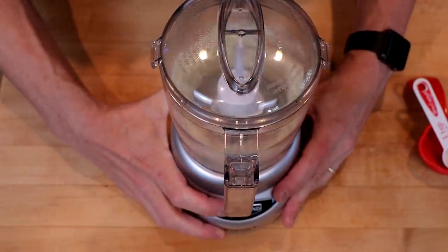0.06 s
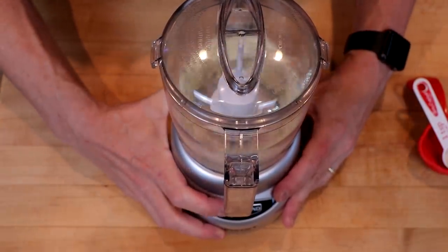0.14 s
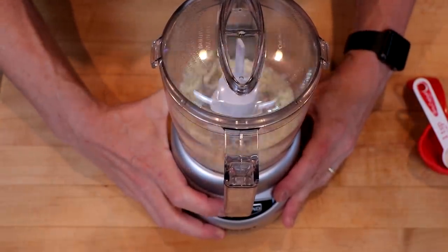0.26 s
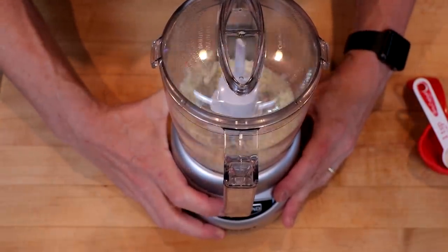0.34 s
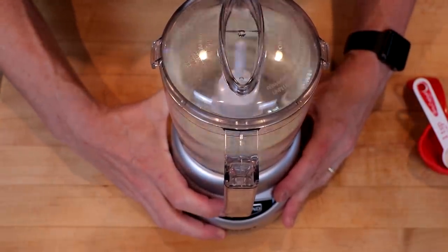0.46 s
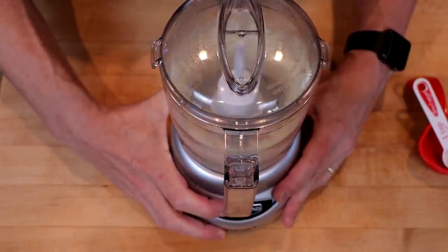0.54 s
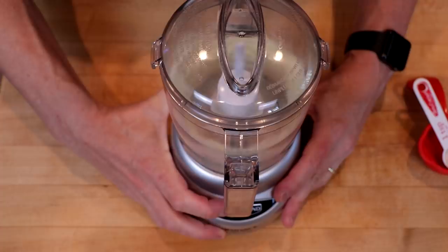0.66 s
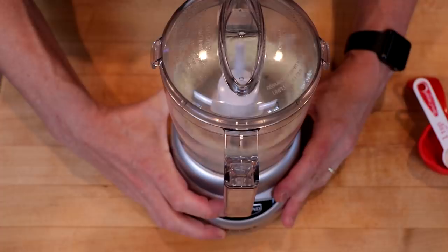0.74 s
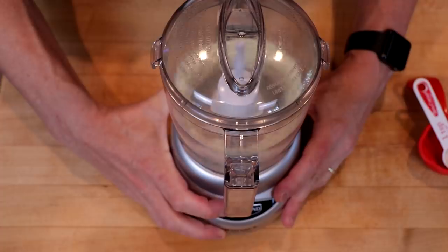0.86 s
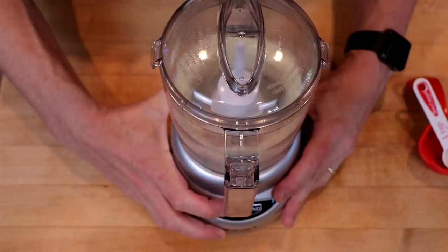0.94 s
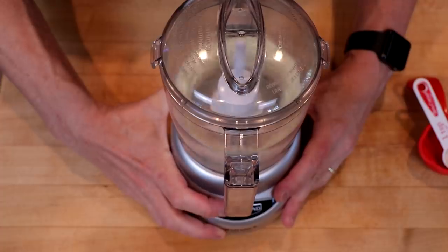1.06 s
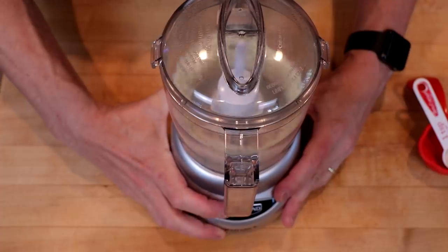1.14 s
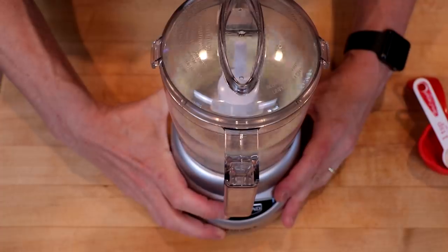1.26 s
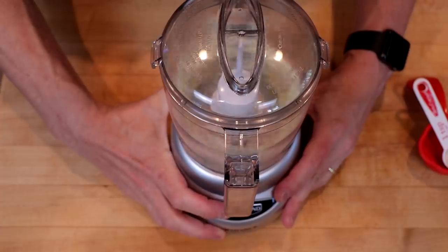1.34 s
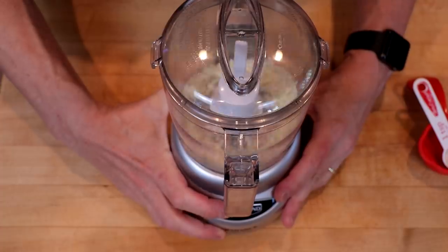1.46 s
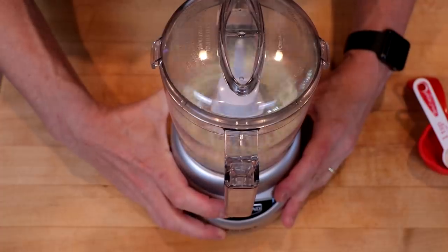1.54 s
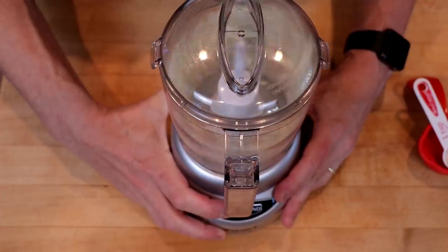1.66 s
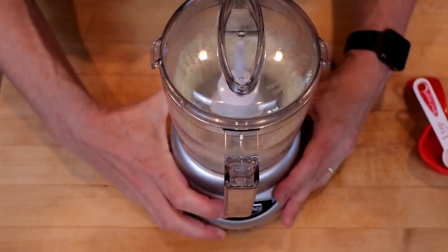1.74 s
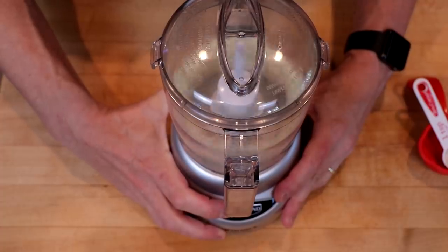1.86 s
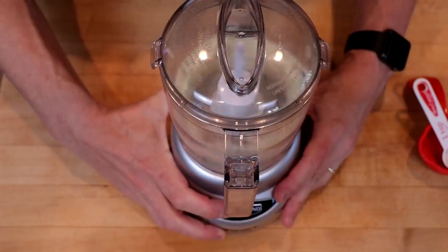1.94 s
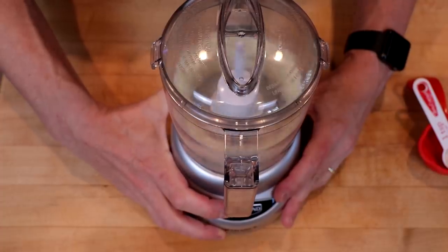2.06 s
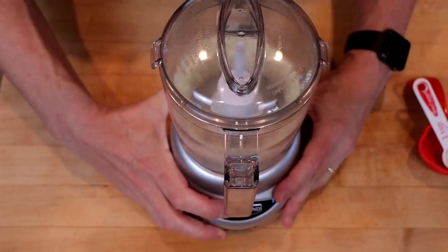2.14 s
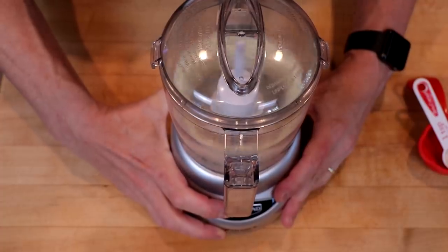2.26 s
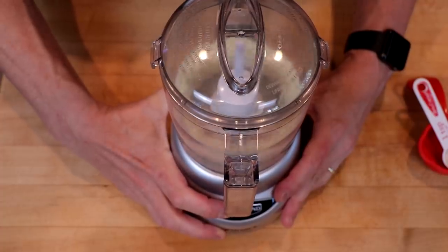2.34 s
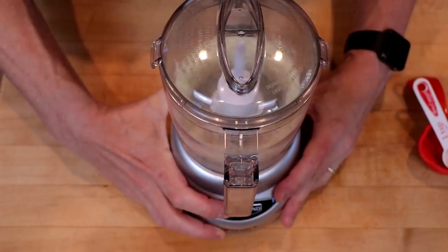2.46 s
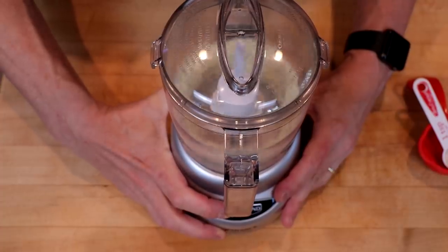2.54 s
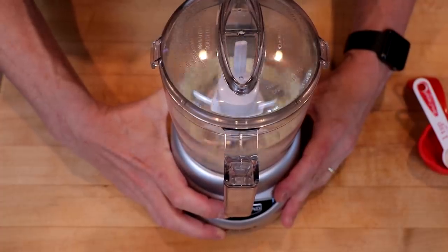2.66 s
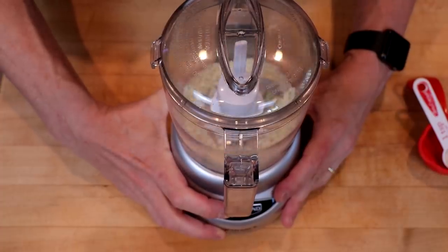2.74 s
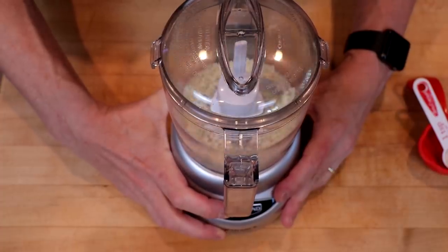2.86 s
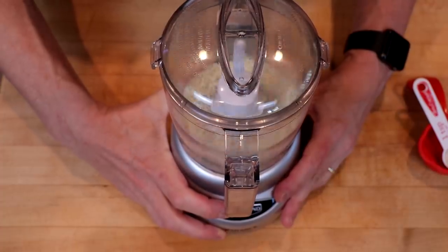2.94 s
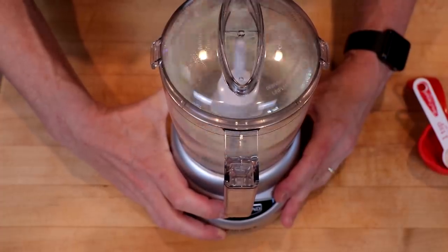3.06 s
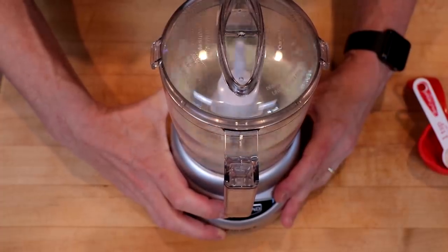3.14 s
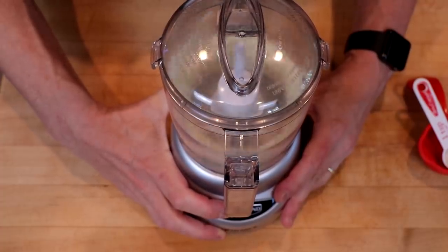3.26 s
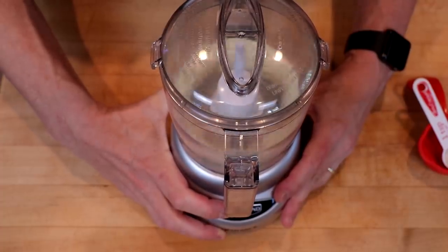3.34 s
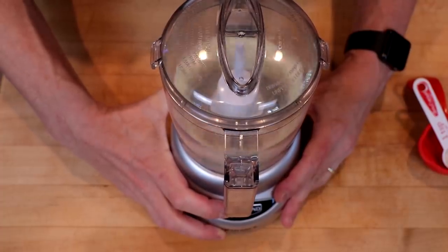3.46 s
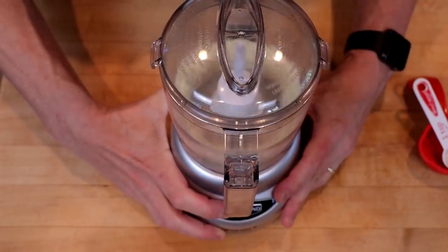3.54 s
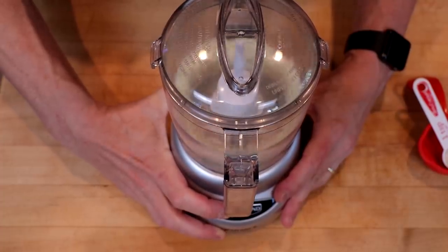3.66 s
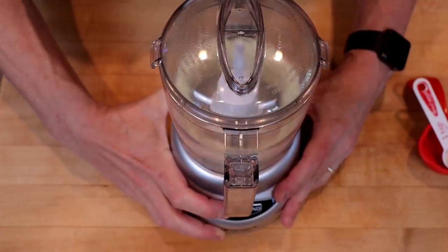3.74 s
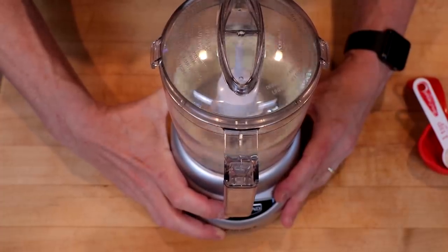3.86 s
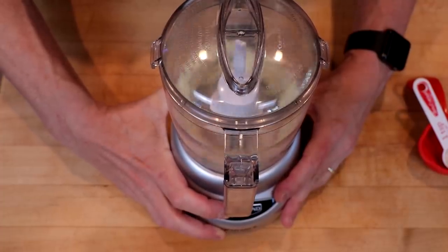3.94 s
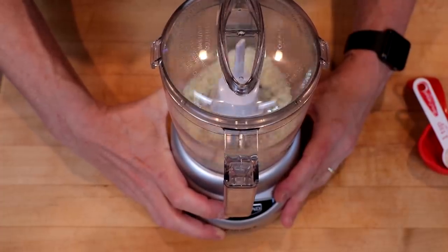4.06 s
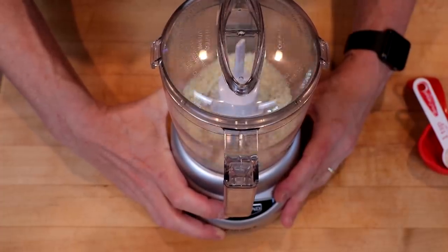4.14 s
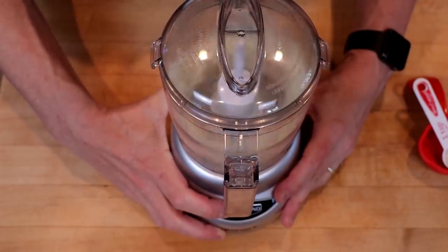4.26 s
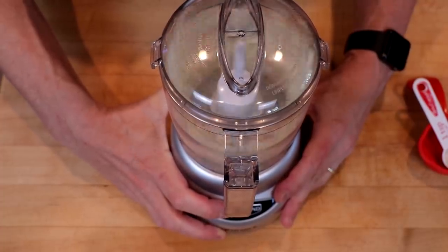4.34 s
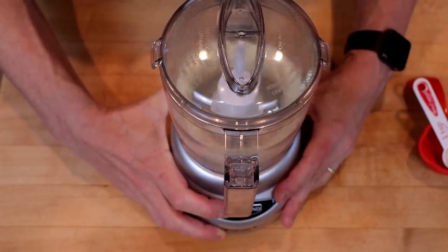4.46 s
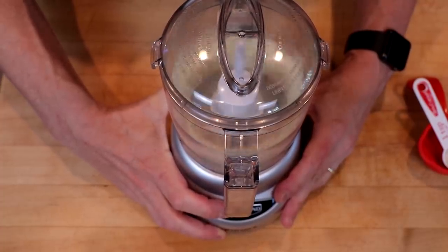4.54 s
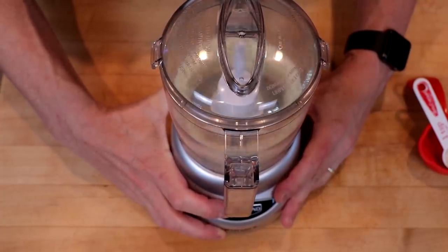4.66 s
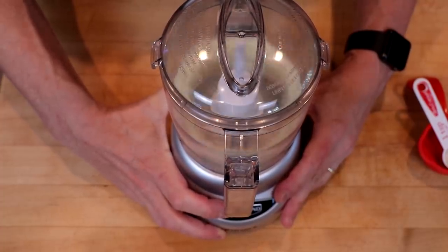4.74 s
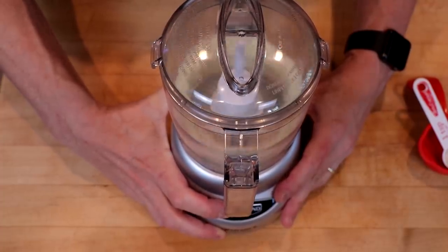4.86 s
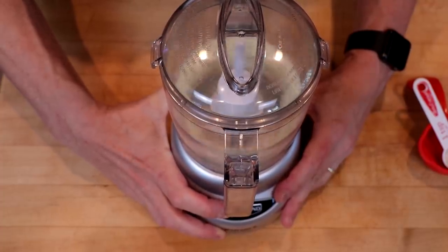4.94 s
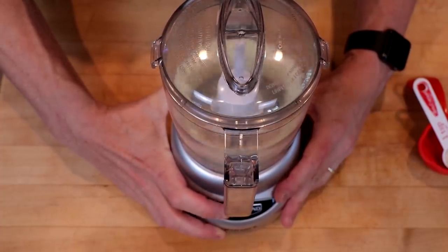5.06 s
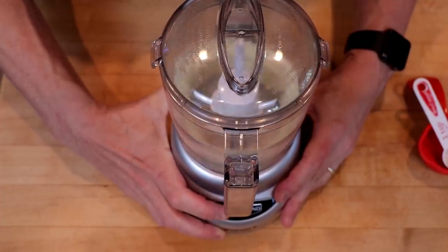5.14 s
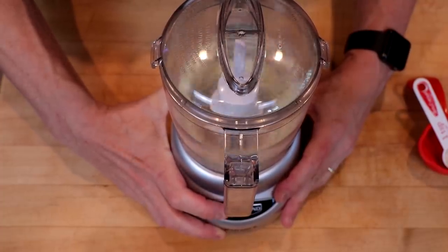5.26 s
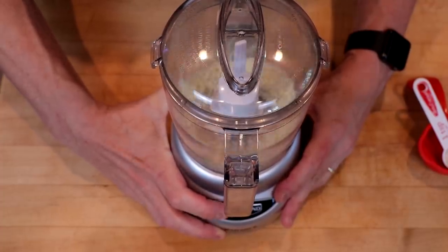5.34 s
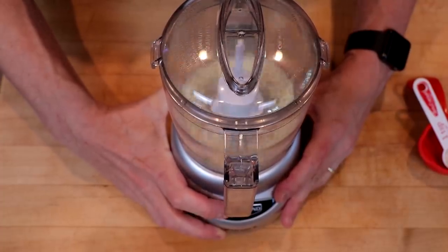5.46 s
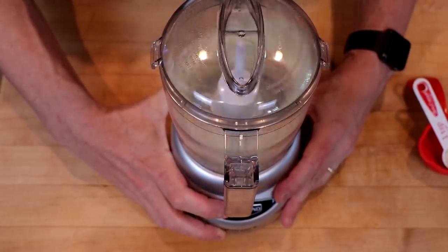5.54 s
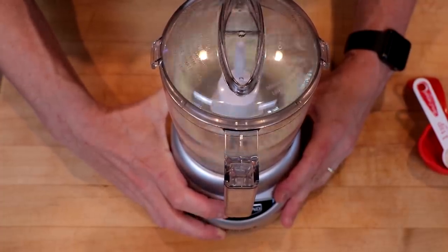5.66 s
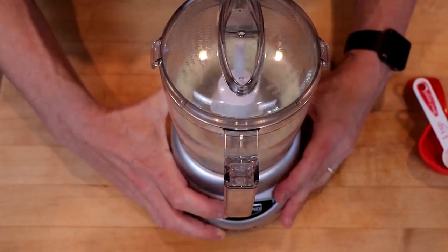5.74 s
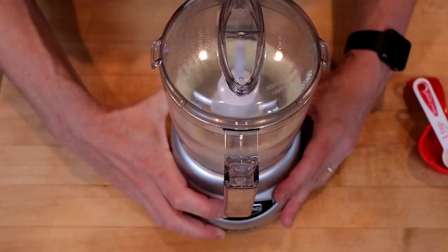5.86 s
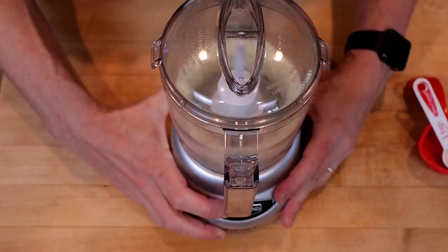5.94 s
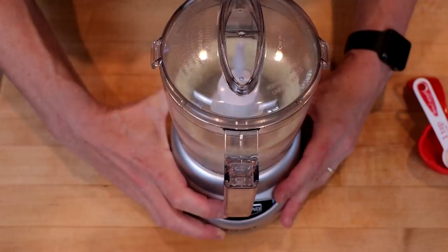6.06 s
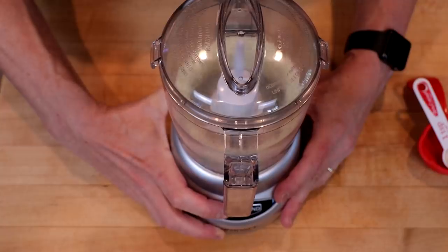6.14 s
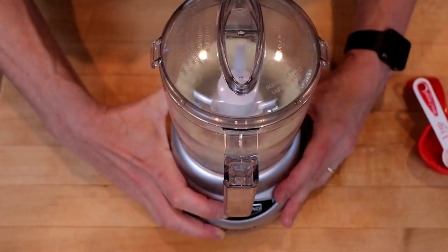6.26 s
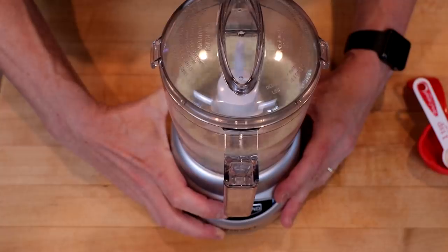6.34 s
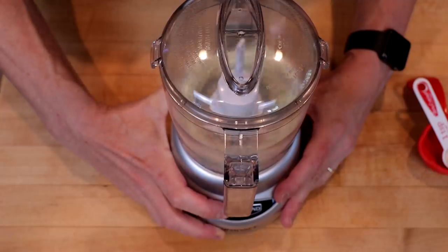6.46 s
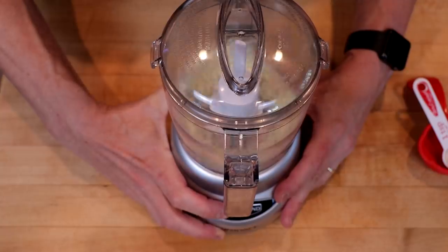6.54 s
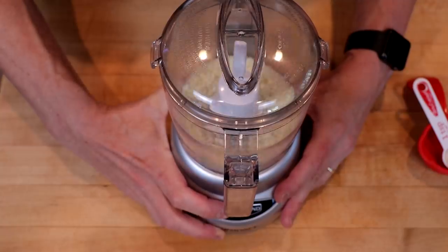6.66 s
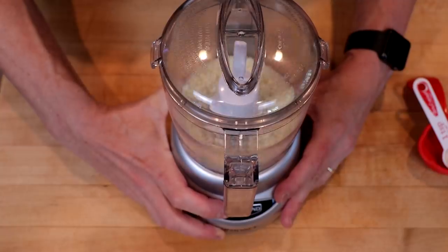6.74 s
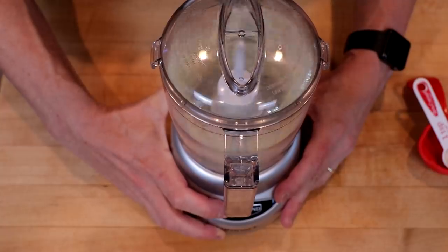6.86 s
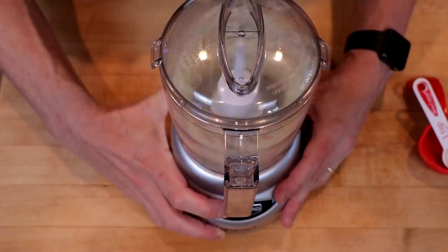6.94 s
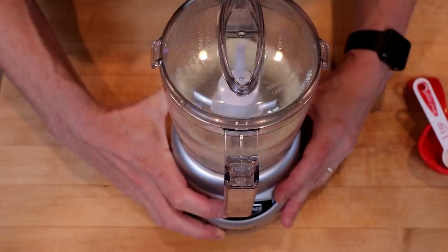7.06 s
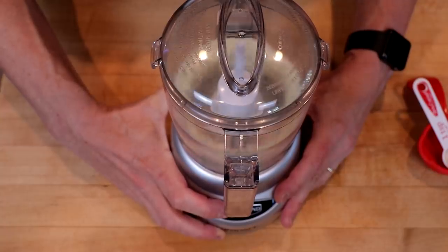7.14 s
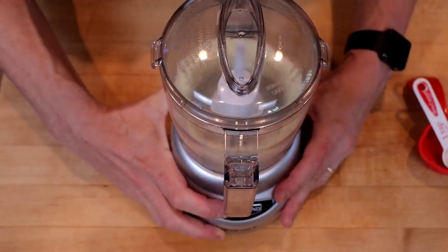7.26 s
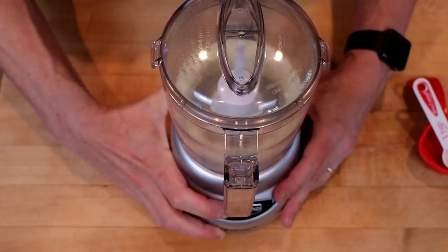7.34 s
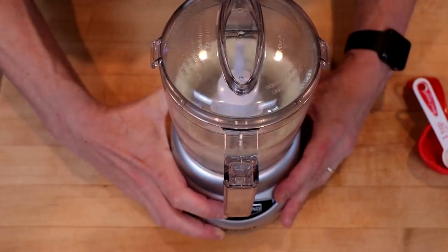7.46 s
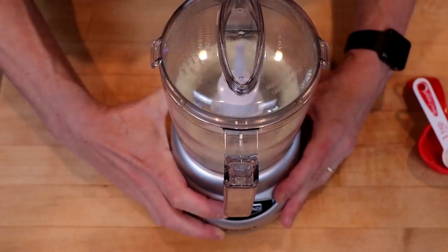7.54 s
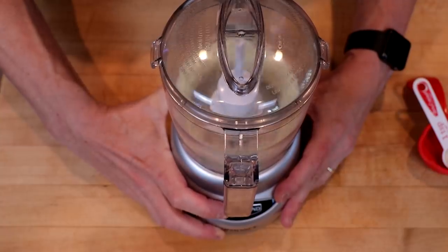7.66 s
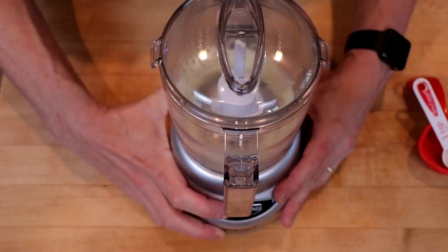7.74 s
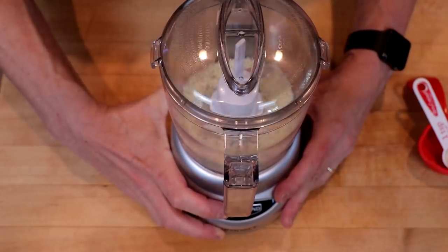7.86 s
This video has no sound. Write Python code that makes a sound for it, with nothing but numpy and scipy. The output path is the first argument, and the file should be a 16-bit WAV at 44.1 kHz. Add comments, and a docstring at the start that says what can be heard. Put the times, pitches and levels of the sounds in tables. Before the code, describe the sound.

Six short bursts of a food processor in a quiet kitchen, each a rattling whine with pattering food, ending in a falling whir.

```python
"""A small food processor on a wooden kitchen counter. An earlier pulse coasts out and the bowl settles.
Six pulses follow. Each press jerks the drive into motion and flings food off the blade; the reduction
gears whine up and rattle. Cheese and flour pelt the plastic bowl, lumps knock, heaps drag the speed down.
On release, friction brings the gears to rest in a falling whine. The quiet room hums between pulses."""
import sys
import numpy as np
from scipy import signal
from scipy.fft import rfft, irfft
from scipy.io import wavfile
from scipy.ndimage import uniform_filter1d

SR = 44100
rng = np.random.default_rng(int(sys.argv[2]) if len(sys.argv) > 2 else 0)


def persist_wave(psi):
    """Save psi, clipped to +-1, as 16-bit WAV."""
    counts = np.round(np.clip(psi, -1, 1) * 32767).astype(np.int16)
    wavfile.write(sys.argv[1], SR, np.atleast_2d(counts).T)


N = 348390
TIME = np.arange(N) / SR
PINION_TEETH, WHEEL_TEETH = 11, 57
BAND_LIMIT_HZ = 15950


def amp(db):
    """Decibels to gain."""
    return 10 ** (np.asarray(db) / 20)


def unit(x):
    """Scale to rms 1."""
    return x / np.sqrt(np.mean(x ** 2) + 1e-20)


def log_interp(points, hz):
    """Interpolate on a log-frequency axis."""
    f, value = np.transpose(points)
    return np.interp(np.log(hz + 1), np.log(f), value)


def colour(x, spectrum):
    """Filter x by a spectrum."""
    return irfft(rfft(x) * amp(log_interp(spectrum, np.fft.rfftfreq(N, 1 / SR))), N)


def drift(hz, order=4):
    """Noise of rms 1, rolled off above hz."""
    f = np.fft.rfftfreq(N, 1 / SR)
    return unit(irfft(rfft(rng.standard_normal(N)) / (1 + (f / hz) ** order), N))


def steady(x, size=3000):
    """Hold the short-term rms at 1."""
    return x / np.sqrt(abs(uniform_filter1d(x ** 2, size)) + 1e-4 * np.mean(x ** 2))


def add(mix, at_s, sound):
    """Mix a sound in at at_s."""
    part = mix[round(at_s * SR):][:len(sound)]
    part += sound[:len(part)]


# Button presses: (on [s], off [s], free tooth rate [Hz], coast time [s],
# whine base [dB], rattle base [dB], chopping base [dB], fling rise [s])
PRESSES = [(-1.0, -.25, 2860, .415, -33.5, -38.5, -46.5, .008),
           (.357, 1.005, 2860, .413, -33.4, -39.4, -43.6, .005),
           (1.547, 2.281, 2868, .411, -33.5, -39.8, -43, .004),
           (2.908, 3.57, 2920, .42, -33.2, -39.8, -43.2, .025),
           (4.2, 4.877, 2903, .445, -33.3, -38.9, -44, .005),
           (5.471, 6.121, 2965, .44, -33.9, -39.2, -43.7, .012),
           (6.75, 7.356, 2955, .444, -33.6, -39.3, -44, .006)]
# Heaps sliding into the blade: (time [s], chopping swell [dB], tooth rate drop [Hz])
HEAPS = [(.617, 9, 205), (.81, 3, 15), (.89, 3, 30), (1.805, 4, 113), (2.04, 4, 60), (2.335, 2.5, 10),
         (3.178, 3, 130), (3.375, 3, 75), (4.46, 2.5, 95), (4.64, 2, 40), (4.803, 5.5, 45),
         (5.725, 1.5, 115), (5.825, 2, 50), (6.12, 4, 10), (7.03, 2.5, 120), (7.125, 1, 35), (7.215, 2, 70),
         (7.32, 3, 10)]


def tooth_rate(spin_up_s=.083, sag_s=.052, coast_bend=1.2):
    """Gear mesh rate in Hz: quick run-up, a sag after each heap, run-down by friction."""
    sag_hz = np.zeros(N)
    for at_s, _, drop_hz in HEAPS:
        age = np.maximum(TIME - at_s, 0) / sag_s
        sag_hz += drop_hz * (age * np.exp(1 - np.minimum(age, 50))) ** 2
    mesh_hz = np.zeros(N)
    for on_s, off_s, free_hz, coast_s, *_ in PRESSES:
        run_up = 1 - np.exp(-(np.clip(TIME, on_s, off_s) - on_s) / spin_up_s)
        run_down = np.clip(1 - (TIME - off_s) / coast_s, 0, 1) ** coast_bend  # 1 = dry friction alone
        mesh_hz += (free_hz - sag_hz) * run_up * run_down
    return mesh_hz


def press_gains():
    """Base gains of whine, rattle and chopping, held until the next press."""
    rows = np.array(PRESSES)
    latest = np.searchsorted(rows[:, 0], TIME) - 1
    return amp(rows[:, 4:7])[latest].T


def blade_load(teeth, once, twice):
    """The blade meets the food once a turn and, with its two wings, twice a turn."""
    angle = 2 * np.pi * teeth / WHEEL_TEETH
    return once * np.sin(angle) + twice * np.sin(2 * angle + 0.96 * drift(5.2))


# Housing response: (frequency [Hz], gain [dB])
HOUSING_SPECTRUM = [(300, -10.5), (700, -6.5), (1150, -2), (1450, 0), (1700, -7.5), (2050, 5.5),
                    (2900, -1.2), (3500, -5), (4400, 0), (5700, 0.8), (7000, 2), (8500, 0.8), (10000, 2),
                    (11900, -5.5), (13300, -15.5)]


def gear_whine(teeth, speed, held, speed_ripple=.009, slip_teeth=.035, backlash_teeth=.045):
    """Tooth rate harmonics, smeared in phase and strength by gear play and the swinging load."""
    load = blade_load(teeth, once=0.75, twice=1.0)
    mesh_hz = np.gradient(teeth) * SR
    phase = teeth + np.cumsum(speed_ripple * mesh_hz * load) / SR + slip_teeth * drift(60)
    phase += backlash_teeth * (1 - speed) * drift(280)
    force_db = 1.1 * load + 1.5 * drift(210) + (0.5 - held) * drift(60)
    # Teeth meet hard under starting torque, softly when coasting.
    softness = 0.37 + (1 - speed) * (.85 * (1 - held) - 0.3 * held)
    tone = np.zeros(N)
    for k in range(1, 11):
        in_band = np.clip((BAND_LIMIT_HZ - k * mesh_hz) / 1000, 0, 1)
        flutter = 1 + .95 * (drift(80, order=1) + 1j * drift(80, order=1))
        strength = in_band * k ** -softness * np.exp(-(k / 7.5) ** 2)  # uneven, jittery teeth smear out high orders
        tone += strength * (flutter * np.exp(2j * np.pi * (k * phase + rng.random()))).real
    return steady(colour(amp(force_db) * tone, HOUSING_SPECTRUM))


# Housing resonances and one gap between them: (centre [Hz], width [Hz], gain [dB])
RESONANCES = [(560, 200, 4), (1020, 160, 3.5), (1650, 220, -3), (2200, 210, 4)]


def coast_resonance_db(mesh_hz, held):
    """The whine swells and dips as the coasting gears pass the housing resonances."""
    return (1 - held) * sum(db * np.exp(-((mesh_hz - hz) / width) ** 2) for hz, width, db in RESONANCES)


# Tooth scrape: (frequency [Hz], level [dB])
RATTLE_SPECTRUM = [(200, -25.5), (900, -10.5), (1450, -5.5), (1700, -1), (2100, -1), (2850, 1.5),
                   (3500, -12), (4300, -9), (5500, 0.5), (6700, -3.7), (8800, -5), (10200, -3), (12200, 0),
                   (13200, -15), (16000, -14)]


def gear_rattle(teeth, speed, rough_db=3.5, tick_db=-3.0, dull_hz=2600):
    """Teeth scrape and clatter in uneven bursts, brighter with speed."""
    contact_db = tick_db * np.cos(2 * np.pi * teeth) + blade_load(teeth, once=0.32, twice=0.7)
    contact_db += rough_db * drift(300)
    scrape = colour(amp(contact_db) * rng.standard_normal(N), RATTLE_SPECTRUM)
    dull = signal.filtfilt(*signal.butter(1, dull_hz, fs=SR), scrape)
    brightness = np.clip(0.08 + speed ** 2.5, 0, 1)
    return steady(dull + brightness * (scrape - dull))


# Food spray on the bowl: (frequency [Hz], level [dB])
CHOP_SPECTRUM = [(40, -40.5), (50, -15), (70, -18), (95, -12.5), (138, -11.5), (170, -6.5), (255, 3.5),
                 (320, 0), (490, -7), (590, 3), (680, 1), (790, 0), (1020, -1), (1200, -5), (2400, -7.5),
                 (5000, -27)]


def chopping(teeth, crumbs_per_s=1800, spread_db=2.0):
    """Crumbs pelt the bowl in a swish of flour, in step with the blade."""
    sizes = amp(spread_db * np.minimum(rng.exponential(1, N), 4)) * rng.choice([-1, 1], N)
    crumbs = unit(sizes * (rng.random(N) < crumbs_per_s / SR))
    flour = 0.4 * rng.standard_normal(N)
    spray = (crumbs + flour) * amp(blade_load(teeth, once=1.1, twice=2.1))
    return steady(colour(spray, CHOP_SPECTRUM))


def food_flow(speed, lag_s=.08, heap_s=.025):
    """Chopping gain: the swirl lags the blade and swells with each heap."""
    pole = np.exp(-1 / (lag_s * SR))
    swirl = signal.lfilter([1 - pole], [1, -pole], speed, zi=[speed[0]])[0]
    swell_db = sum(db * np.exp(-np.minimum(((TIME - at_s) / heap_s) ** 2, 50)) for at_s, db, _ in HEAPS)
    return swirl ** 0.9 * speed ** 0.45 * amp(swell_db)


def food_fling(gain_db=-42.3, fade_s=.07):
    """Extra chopping gain: food resting on the blade is thrown off at each start."""
    flurries = np.zeros(N)
    for on_s, *_, rise_s in PRESSES:
        age_s = np.maximum(TIME - on_s, 0)
        flurries += (1 - np.exp(-age_s / rise_s)) * np.exp(-age_s / fade_s)
    return amp(gain_db) * flurries


def strike(modes, snap_db, snap_s, size=5000):
    """One blow of peak 1: randomly detuned decaying modes plus a noise snap."""
    t = np.arange(size) / SR
    ring = np.zeros(size)
    for hz, db, t60_s in modes:
        cycles = hz * rng.uniform(1.0, 1.04) * t + rng.random()
        ring += amp(db - 60 * t / t60_s) * np.sin(2 * np.pi * cycles)
    snap = amp(snap_db) * rng.standard_normal(size) * np.exp(-t / snap_s)
    blow = (ring / abs(ring).max() + snap) * (1 - np.exp(-t / 0.00023))
    return blow / abs(blow).max()


# Modes of bowl seat, bowl and drive: (frequency [Hz], relative level [dB], t60 [s])
SEAT_MODES = [(730, -5, .05), (950, 0, .07), (1130, -2, .05), (2080, -12, .04)]
BOWL_MODES = [(250, -6.5, 0.055), (585, -2.5, 0.035), (730, -4, 0.086), (954, -2, 0.11), (1500, -7, 0.075),
              (1900, -2.5, 0.035), (2600, -16, .015)]
DRIVE_MODES = [(586, -8.5, 0.061), (1250, -7, 0.013), (1940, 18.5, 0.0067), (2270, -3.5, 0.015),
               (2750, -41.5, 0.0062)]
# Gears taking up slack: (time [s], level [dB], relative snap [dB])
JERKS = [(.3625, -21.5, -13), (1.5525, -24.5, -8), (2.917, -39, -6), (4.205, -19.5, -2), (5.477, -33, -12),
         (6.7575, -25, -8)]
# Lumps hitting the bowl: (time [s], level [dB])
LUMPS = [(.617, -28.5), (.622, -25.5), (0.785, -35.5), (2.038, -30.5), (2.062, -32), (2.238, -35),
         (2.326, -33.5), (3.201, -33.5), (4.799, -31), (4.811, -35), (5.989, -34), (6.129, -32.5),
         (7.33, -37)]


def knocks(settle_s=.2125, settle_db=-49.5, switch_db=-47):
    """The bowl settles in its seat, the switch closes, the drive jerks, lumps hit the bowl."""
    hits = np.zeros(N)
    add(hits, settle_s, amp(settle_db) * strike(SEAT_MODES, snap_db=-25, snap_s=.002))
    for on_s, *_ in PRESSES:
        add(hits, on_s, amp(switch_db) * strike(BOWL_MODES, snap_db=3, snap_s=.0046))
    for at_s, db, snap_db in JERKS:
        add(hits, at_s, amp(db) * strike(DRIVE_MODES, snap_db, snap_s=.0012))
    for at_s, db in LUMPS:
        add(hits, at_s, amp(db) * strike(BOWL_MODES, snap_db=-21.5, snap_s=.002))
    # Plastic radiates little top treble.
    return signal.sosfilt(signal.butter(4, 12000, fs=SR, output="sos"), hits)


def motor(teeth, speed, held, mains_hz=60, hum_db=-69, inrush_db=12.5, rotor_db=-59):
    """Powered windings hum, most at standstill; rotor unbalance sounds once a turn."""
    angle = 2 * np.pi * 2 * mains_hz * TIME
    hum = held * amp(hum_db + inrush_db * (1 - speed)) * (np.sin(angle) + 0.33 * np.sin(2 * angle))
    unbalance = amp(rotor_db + 2 * drift(16)) * speed ** 4 * np.sin(2 * np.pi * teeth / PINION_TEETH)
    return hum + unbalance


# Kitchen reverberation: (frequency [Hz], t60 [s])
KITCHEN_DECAY = [(200, 0.8), (1000, 0.3), (4000, 0.52), (12000, 0.39)]


def kitchen(x, early_db=-9, tail_db=-14, echoes=10, size=22050):
    """Direct sound, early echoes off counter and cupboards, then a short tail."""
    early = np.zeros(size)
    early[rng.integers(60, 900, echoes)] = rng.choice([-1, 1], echoes) / np.sqrt(echoes)
    taps = rng.standard_normal(size) * (np.arange(size) > 400)
    hz, t, bands = signal.stft(taps, SR, nperseg=256)
    decay = amp(-60 * t / log_interp(KITCHEN_DECAY, hz)[:, None])
    tail = signal.istft(bands * decay, SR, nperseg=256)[1][:size]
    response = amp(early_db) * early + amp(tail_db) * tail / np.linalg.norm(tail)
    return x + signal.fftconvolve(x, response)[:N]


# Room air: (frequency [Hz], relative level [dB])
AIR_SPECTRUM = [(35, -39), (52, -11), (80, -8.5), (110, -6.5), (165, -10), (250, -6), (320, -6.5),
                (420, -2.5), (540, -3), (640, -15.5), (950, -11), (2000, -16.5), (4500, -38.5),
                (15000, -37.5)]
# Appliance hum: (frequency [Hz], rms level [dB])
HUM_TONES = [(118.4, -77.5), (236.9, -77.5), (403.7, -75.5), (922, -83)]


def room_tone(air_db=-68.5, waver_db=2.2):
    """Soft air noise and the wavering hum of a kitchen appliance."""
    hum = np.zeros(N)
    for hz, db in HUM_TONES:
        peak = amp(db + waver_db * drift(4)) * np.sqrt(2)
        hum += peak * np.sin(2 * np.pi * (hz * TIME + rng.random()))
    return amp(air_db) * unit(colour(rng.standard_normal(N), AIR_SPECTRUM)) + hum


def scene(start_whine_db=16, start_rattle_db=8):
    """One speed drives gears, blade and motor; the gears get louder with speed and starting torque."""
    mesh_hz = tooth_rate()
    teeth = np.cumsum(mesh_hz) / SR
    speed = mesh_hz / mesh_hz.max()
    button = sum(1. * ((TIME > on_s) & (TIME < off_s)) for on_s, off_s, *_ in PRESSES)
    held = uniform_filter1d(button, size=300)
    torque = held * (1 - speed) ** 3
    whine_gain, rattle_gain, chop_gain = press_gains()
    boost_db = start_whine_db * torque + coast_resonance_db(mesh_hz, held)
    whine = whine_gain * amp(boost_db) * speed ** 1.62 * gear_whine(teeth, speed, held)
    rattle = rattle_gain * amp(start_rattle_db * torque) * speed ** 1.4 * gear_rattle(teeth, speed)
    food = (chop_gain * food_flow(speed) + food_fling()) * chopping(teeth)
    machine = whine + rattle + food + motor(teeth, speed, held) + knocks()
    return (kitchen(machine) + room_tone())[None]


def record(dry):
    """Microphone low cut at 46 Hz, then the band limit."""
    cut = signal.sosfilt(signal.butter(N=6, Wn=46, btype="high", fs=SR, output="sos"), dry)
    lowpass = signal.firwin(511, BAND_LIMIT_HZ, window=("kaiser", 9), fs=SR)
    return signal.oaconvolve(cut, lowpass[None], "same")


dry = scene()
out = record(dry)
persist_wave(out)
```